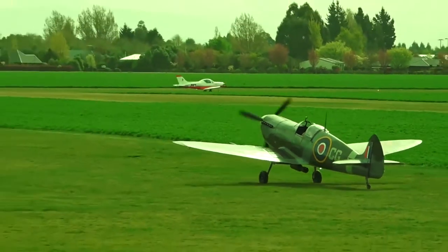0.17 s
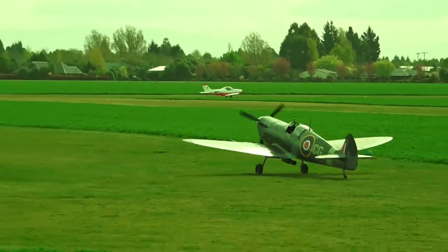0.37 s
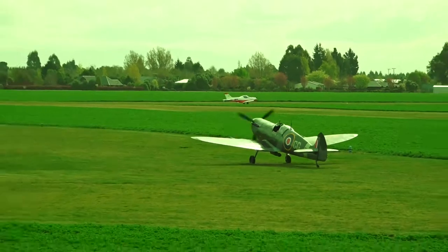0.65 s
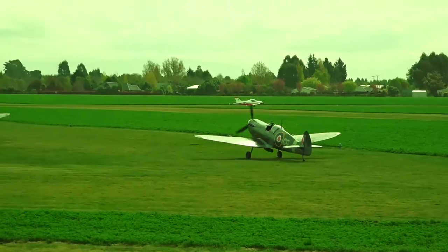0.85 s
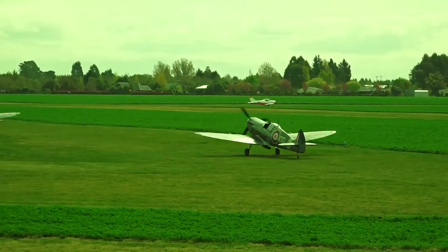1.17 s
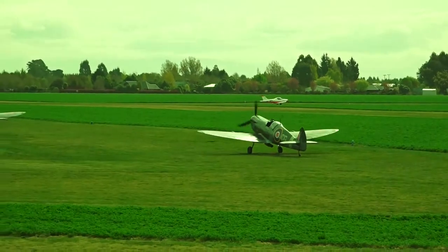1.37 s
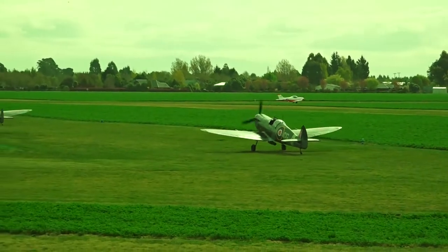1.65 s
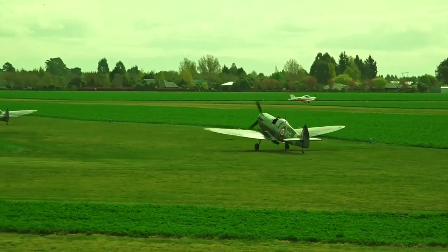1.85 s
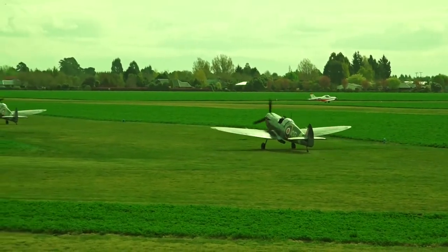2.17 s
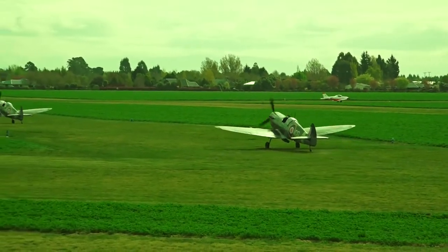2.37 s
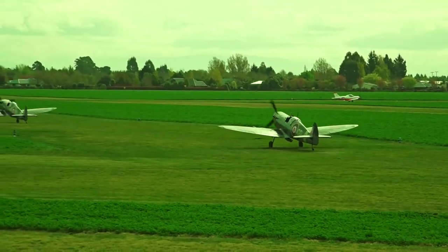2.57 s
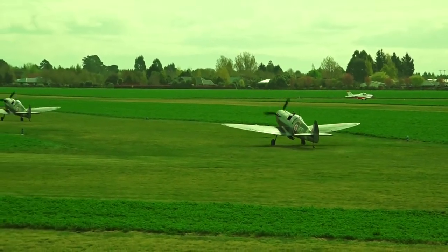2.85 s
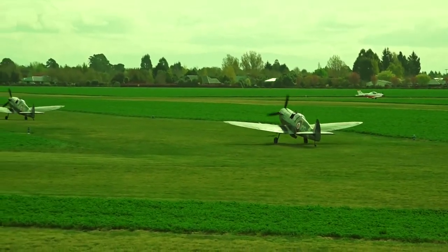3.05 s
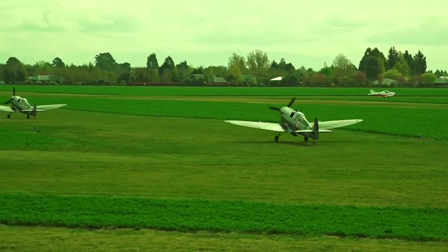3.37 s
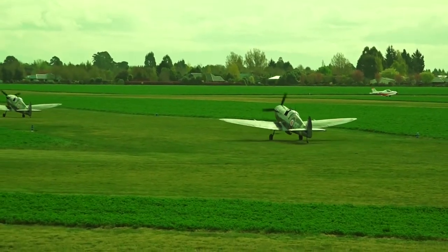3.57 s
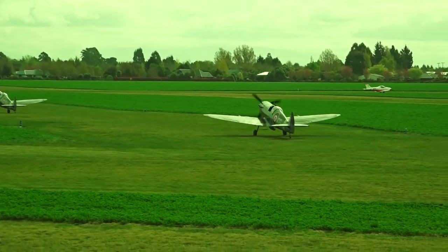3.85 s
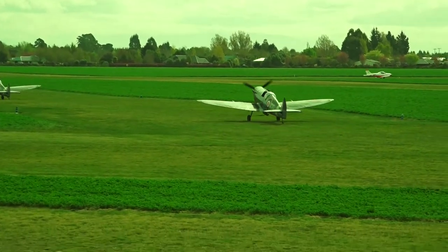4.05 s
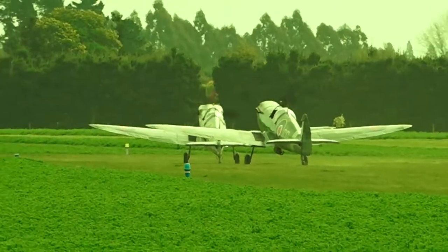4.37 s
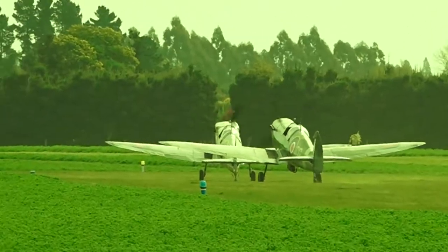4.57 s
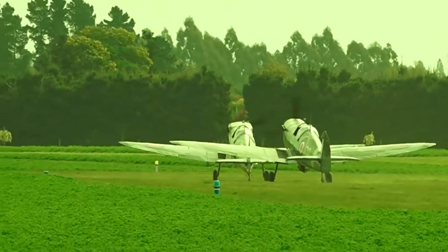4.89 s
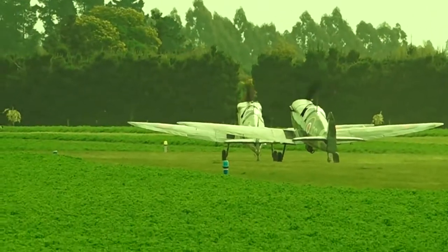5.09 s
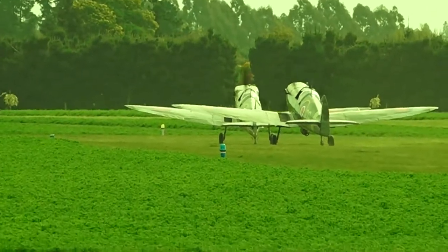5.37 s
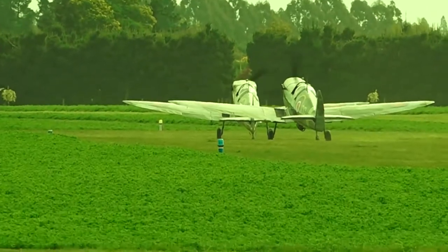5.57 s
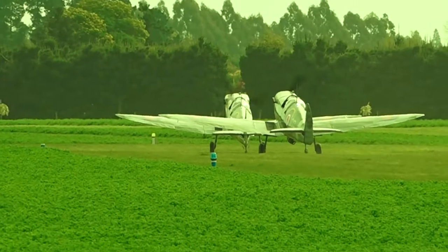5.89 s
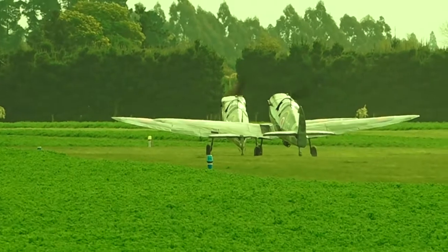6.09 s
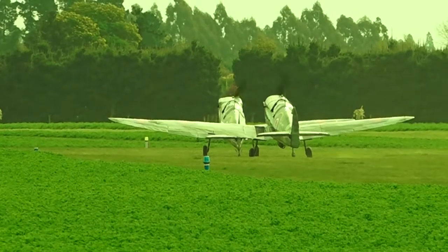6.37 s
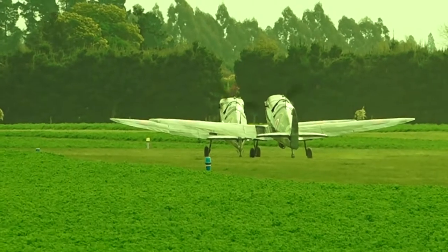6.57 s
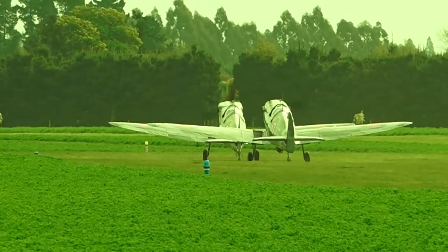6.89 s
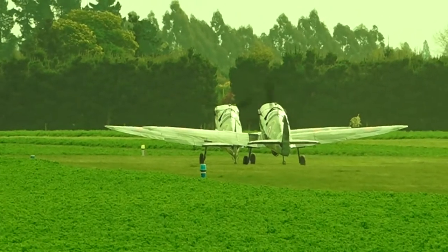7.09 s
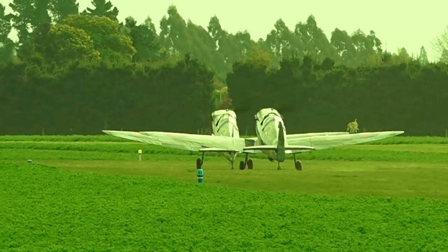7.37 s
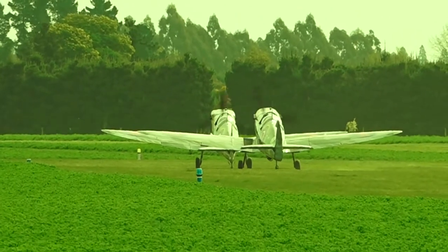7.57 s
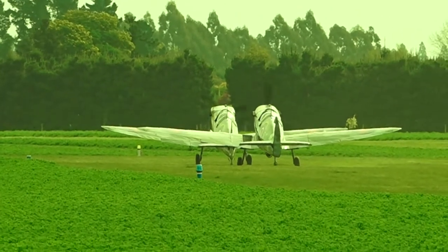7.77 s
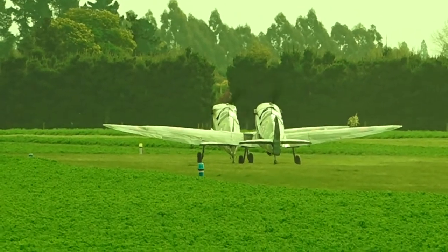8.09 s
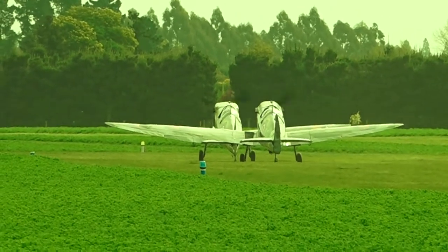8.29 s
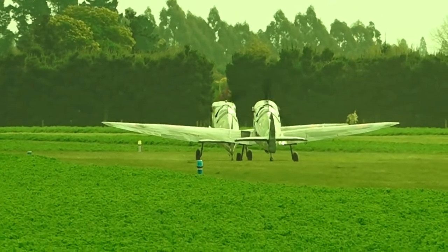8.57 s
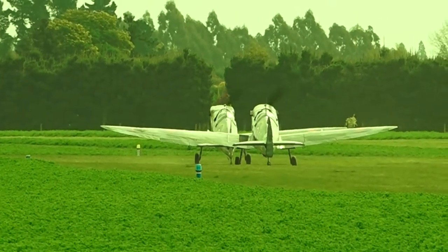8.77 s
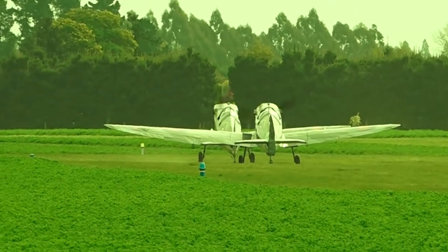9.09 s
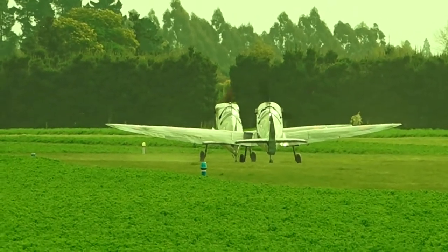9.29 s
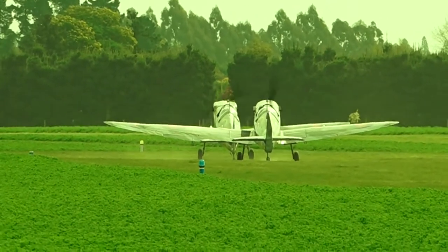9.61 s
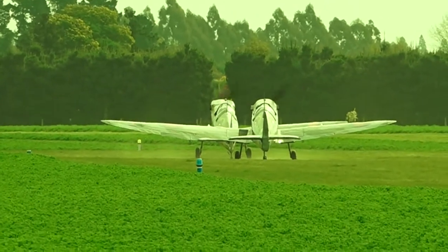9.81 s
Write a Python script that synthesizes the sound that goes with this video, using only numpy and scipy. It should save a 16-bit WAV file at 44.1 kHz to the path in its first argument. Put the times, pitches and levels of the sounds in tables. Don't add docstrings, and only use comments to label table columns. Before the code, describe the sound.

Close propeller plane growls louder for four seconds, then the scene snaps to low gusty wind thumps, faint lark song and far-off engines.

```python
import sys
import numpy as np
from scipy import signal
from scipy.fft import rfft, irfft, next_fast_len
from scipy.io import wavfile
from scipy.ndimage import uniform_filter1d, map_coordinates

SR = 44100
rng = np.random.default_rng(int(sys.argv[2]) if len(sys.argv) > 2 else 0)


def file_out(sig):
    cols = np.atleast_2d(sig).T
    lim = np.clip(cols, -1, 1)
    pcm = np.round(lim * 32767).astype(np.int16)
    wavfile.write(sys.argv[1], SR, pcm)


def voltage_ratio(decibels):
    exponent = np.asarray(decibels, float) / 20
    return 10 ** exponent


N = 438345
TIME = np.arange(N) / SR
CUT_S, FADE_S = 4.1355, 0.019
TURN_S = 2.33


def unit(x):
    return x / np.sqrt(np.mean(x ** 2) + 1e-20)


def curves(rows):
    t_s, *cols = np.transpose(rows)
    return [np.interp(TIME, t_s, c) for c in cols]


def wobble(rate_hz):
    coarse = TIME[::64]
    knots = rng.standard_normal(int(N * rate_hz / SR) + 4)
    return np.interp(TIME, coarse, map_coordinates(knots, [coarse * rate_hz]))


def colour(points, hz):
    f_hz, db = np.transpose(points)
    gain = voltage_ratio(np.interp(np.log(hz + 1e-3), np.log(f_hz), db))
    return gain * (hz >= f_hz[0]) * (hz <= f_hz[-1])


def shaped(x, points):
    m = next_fast_len(N + 8192)
    gain = colour(points, np.fft.rfftfreq(m, 1 / SR))
    return unit(irfft(rfft(x, m) * gain, m)[:N])


def noise(points):
    return shaped(rng.standard_normal(N), points)


def level(x, seconds):
    size = round(seconds * SR / 2)
    power = uniform_filter1d(uniform_filter1d(x ** 2, size), size)
    return x / np.sqrt(np.abs(power) + .05)


def add(track, t_s, sound):
    part = track[round(t_s * SR):][:len(sound)]
    part += sound[:len(part)]


# t/s, engine cycles/Hz
ENGINE_SPEED = [(0.0, 10.573), (0.4, 10.21), (0.7, 10.12), (1.0, 10.46), (1.4, 11.51), (1.8, 12.36),
                (2.2, 12.76), (2.6, 12.81), (4.1, 12.79)]


def aircraft():
    cycle_hz = uniform_filter1d(curves(ENGINE_SPEED)[0], size=SR // 5, mode="nearest")
    turns = np.cumsum(cycle_hz) / SR
    return exhaust(turns, cycle_hz) + propeller(turns, cycle_hz)


# multiple of the cycle, full-speed level/dB, gain per Hz of lower speed/dB
FIRING_ORDERS = [(8, 16, -1.5), (10, -13, -2), (11, 13, -2.5), (12, 4, -5), (13.04, 13.5, -0.74),
                 (14.02, 3, 0), (14.97, 3.5, 1.5), (15.94, 13.5, -3), (17.01, 2.5, 0.3), (18, -2, -2.1),
                 (18.94, 5, 0.2), (21, 13.5, -2.5), (22.04, 4.5, -1.5), (23.12, -1, -1.5), (23.94, 6.5, -2),
                 (25, -5.5, 0.2), (25.98, 2, -4), (26.97, 3, -0.5), (27.97, -3.5, 0), (29.02, -0.5, -0.2),
                 (30.1, 1.5, -2.5), (31.02, 3.5, -3.5), (31.86, 1, 1.24), (32.85, -4.5, -3.5),
                 (33.75, -1.5, -3.5), (34.9, -7, 1.5), (36.1, -8, -2.5), (37.1, -9, -2), (37.95, 4, -5.5),
                 (40, -2, -0.5), (41.14, 1.5, -1), (41.9, -5.5, -1.5), (42.7, -4.5, -0.5), (44, 2.3, -2.5),
                 (44.7, -3, -1.6)]
# f/Hz, level/dB
PIPE_COLOUR = [(70.0, -21.5), (110.0, -18), (150.0, -8.5), (190.0, -4), (230.0, -10), (270.0, -2),
               (310.0, 1), (350.0, -0.5), (400.0, -8.5), (460.0, -6.5), (600.0, -26.5)]
# f/Hz, level/dB per Hz
BREATH_COLOUR = [(60, 1), (110, 9), (200, 13.5), (320, 1), (450, -13), (600, -45.5)]


def exhaust(turns, cycle_hz):
    idle_hz, idle_db, rev_db_per_hz = 10.04, -24, 1.5
    turn_db_per_s, beat_db_per_s = 2, 5
    even_share, even_s = .45, .03
    firing, near = np.zeros(N), TIME < CUT_S + FADE_S
    slack_hz = cycle_hz.max() - cycle_hz
    beat_db = beat_db_per_s * np.clip(TIME[near] - 2.6, 0, 1)
    for k, full_db, slow_db in FIRING_ORDERS:
        wander = (0.23 + 0.18 * slack_hz) * wobble(6.06)
        phase = 2 * np.pi * k * turns[near] + rng.uniform(0, 2 * np.pi) + wander[near]
        order_db = full_db + slow_db * slack_hz[near] + (k < 9) * beat_db + 1.37 * wobble(4.996)[near]
        firing[near] += voltage_ratio(order_db) * colour(PIPE_COLOUR, k * cycle_hz[near]) * np.sin(phase)
    firing[~near] = firing[near].std()
    steady = level(unit(firing), 0.9)
    tone = (1 - even_share) * steady + even_share * level(steady, even_s)
    puffs = 1 + .5 * np.cos(2 * np.pi * 8 * turns)
    loud_db = idle_db + rev_db_per_hz * (cycle_hz - idle_hz)
    loud_db = loud_db - turn_db_per_s * np.maximum(TIME - TURN_S, 0)
    return voltage_ratio(loud_db) * (tone + voltage_ratio(-11) * puffs * noise(BREATH_COLOUR))


# t/s, level/dB
BLADE_LOAD = [(0, -1), (0.94, -5.5), (1.9, 1), (2.6, 2.5), (2.9, 1.5), (3.3, 2.5), (3.55, 1), (3.8, 1.5),
              (4.1, 2)]
# t/s, share 0-1
SLAP_DEPTH = [(0, 0), (1, 0.07), (1.6, 0.16), (2, 0.3), (2.6, .38), (3.3, 0.45), (3.7, 0.16), (4.1, 0.07)]
# t/s, peak level/dB
HARD_SLAPS = [(1.858, -21), (1.879, -22), (1.925, -21), (1.951, -21), (1.975, -20), (2.045, -17.5),
              (2.067, -22), (2.16, -22), (2.206, -23), (2.251, -23), (2.299, -24), (2.317, -23),
              (2.455, -21), (2.523, -20), (2.545, -19), (2.568, -21), (2.591, -18), (2.636, -17),
              (2.659, -18), (2.681, -22), (2.704, -19), (2.749, -18), (2.772, -22), (2.819, -24),
              (2.842, -25), (2.955, -22), (2.977, -22), (3.134, -20.5), (3.179, -22), (3.202, -19),
              (3.225, -18), (3.248, -17), (3.267, -19), (3.295, -17.5), (3.381, -20), (3.5, -21)]
# f/Hz, level/dB per Hz
WASH_COLOUR = [(220, -3), (380, -7), (456, -10), (480, -5.5), (879, -8), (1450, -11), (1800, -19),
               (2100, -18), (3000, -36), (3900, -65), (6600, -120)]
# f/Hz, level/dB per Hz
TIP_COLOUR = [(1500, -62), (2200, 7), (3000, 2.5), (4500, -6), (6500, -17), (9000, -23.5), (12000, -60)]
# f/Hz, level/dB per Hz
THUD_COLOUR = [(300, -30), (430, -4), (500, 0.5), (680, 0), (950, -3.5), (1300, -8.5), (1800, -13.5),
               (2600, -21), (4000, -45)]


def propeller(turns, cycle_hz):
    passes_per_cycle, known_pass_s = 3.451, 2.592
    load_db, = curves(BLADE_LOAD)
    wash_db, tip_db = -33.5 + 0.51 * load_db, -48.5 + load_db
    depth = np.clip(curves(SLAP_DEPTH)[0], 0, 1)
    swung_s = np.clip(TIME - TURN_S, 0, None)
    behind = np.clip(2.7 * (TIME - 3.56), 0, 1)

    blades = passes_per_cycle * (turns - turns[round(known_pass_s * SR)]) + 100 + .003 * wobble(25)
    count = np.maximum.accumulate(blades).astype(int)
    size_db = 1.2 * rng.standard_normal(424) - 1.5
    slap_s, slap_db = np.transpose(HARD_SLAPS)
    hard = np.round(np.interp(slap_s, TIME, blades)).astype(int)
    size_db[hard] = 0.4 * (slap_db + 23)
    size = voltage_ratio(size_db).take(count, mode="wrap")

    cycle_part = blades % 1
    since_s = (cycle_part - .08 - (cycle_part > .6)) / (passes_per_cycle * cycle_hz)
    rise_s, fall_s = 0.0013 + 0.0019 * np.minimum(swung_s, 1), .003
    puff = size * np.exp(-np.abs(since_s) / np.where(since_s < 0, rise_s, fall_s))
    gate = np.sqrt(1 - depth) + (1 - 0.23 * behind) * np.sqrt(depth) * unit(puff)
    gate = gate / np.sqrt(uniform_filter1d(gate ** 2, SR // 4))

    passes = size * np.diff(count, prepend=count[0])
    ahead = np.clip(0.67 * swung_s, 0, 1) * voltage_ratio(1.8 * wobble(40))
    split = passes + ahead * np.roll(passes, -round(.004 * SR))
    facets = rng.standard_normal(440)
    airframe = facets * voltage_ratio(-60 * TIME[:440] / .013)
    airframe[0] = 7
    late_samples = (np.abs(facets[-9:]) * 3000 % 1000).astype(int)
    fuselage = np.bincount(late_samples, 7 * np.sign(facets[:9]))
    side_on = signal.fftconvolve(split, airframe)[:N]
    tail_on = signal.fftconvolve(passes, fuselage)[:N]
    slaps = (1 - behind) * side_on + voltage_ratio(-4) * behind * tail_on

    thuds, cracks = shaped(slaps, THUD_COLOUR), shaped(slaps, TIP_COLOUR)
    wash = gate ** 0.62 * noise(WASH_COLOUR) + voltage_ratio(1.0) * np.sqrt(depth + .05 * behind) * thuds
    tips = gate ** 0.71 * noise(TIP_COLOUR) + 0.5 * np.sqrt(depth) * cracks
    return voltage_ratio(wash_db + wobble(7.82)) * wash + voltage_ratio(tip_db + wobble(8.1)) * tips


# t/s, length/s, heave level/dB, buffet over heave/dB
GUST_EVENTS = [(0, 0.041, -15, -0.5), (0.365, 0.33, -19.5, -11), (.6, 0.21, -21.5, -2),
               (1.01, 0.3, -20.5, -13), (1.83, .4, -28, -5), (2.2, .2, -20, -8), (2.898, 0.28, -24, -4),
               (3.163, 0.36, -24, -1), (3.61, 0.13, -18, -4.5), (3.863, 0.22, -22, 3.5),
               (4.368, 0.19, -5.5, -16.5), (4.596, 0.25, -8.5, -25), (4.8, 0.16, -9, -10),
               (5.03, 0.23, -24.5, -3), (5.199, 0.11, -13.5, -11), (5.27, 0.1, -3, -14),
               (5.45, .12, -20.5, 0), (5.59, 0.14, -4.5, -16), (5.8, 0.33, -16, -3.5),
               (6.046, 0.17, -5.5, -13), (6.314, 0.15, -16, -4.5), (6.654, 0.31, -8, -19.5),
               (7.02, 0.26, -9, -9), (7.313, 0.17, -10, -11), (7.538, 0.21, -8.5, -23),
               (7.799, 0.12, -8.5, -25), (8.2, 0.35, -15, -9), (8.426, 0.13, -12, -14),
               (8.614, 0.1, -12.5, -8.5), (8.9, 0.33, -14, -7), (9.087, 0.18, -14, -13),
               (9.402, 0.18, -13.5, -32), (9.565, 0.1, -3.5, -15.5), (9.73, 0.073, -12, 3),
               (9.84, 0.18, -11, 6)]
# f/Hz, level/dB per Hz
HEAVE_COLOUR = [(1.3, -26), (2.7, -11.5), (5.4, 7), (10, 8), (16, -8.5), (22, -25), (30, -36)]
# f/Hz, level/dB
HEAVE_LIMIT = [(.5, 0), (17, 0), (24, -8), (34, -30), (60, -70)]
# f/Hz, level/dB per Hz
BUFFET_COLOUR = [(13, -18), (20, 0), (31, -6), (40, -13), (50, -21), (65, -28), (100, -34), (200, -48),
                 (400, -60), (1000, -90)]


def wind():
    calm_heave_db, calm_buffet_db = -31, -33.5
    bells = np.array([np.exp(-(2 * (TIME - t_s) / length_s) ** 2) for t_s, length_s, _, _ in GUST_EVENTS])
    heave_db, over_db = np.transpose(GUST_EVENTS)[2:]
    heave = np.sqrt(voltage_ratio(2 * calm_heave_db) + voltage_ratio(2 * heave_db) @ bells)
    buffet = np.sqrt(voltage_ratio(2 * calm_buffet_db) + voltage_ratio(2 * (heave_db + over_db)) @ bells)
    slow = shaped(level(noise(HEAVE_COLOUR), 0.079), HEAVE_LIMIT)
    quick = voltage_ratio(1.3 * wobble(18)) * level(noise(BUFFET_COLOUR), 0.072)
    return heave * slow + buffet * quick


def larks():
    song = np.zeros(N)
    sing_whistles(song)
    sing_arches(song)
    sing_trills(song)
    t = TIME[:SR // 5]
    scatter = unit(rng.standard_normal(len(t)) * voltage_ratio(-60 * t / 0.21)) / np.sqrt(len(t))
    echo = signal.fftconvolve(song, scatter)[:N]
    return song * voltage_ratio(1.9 * wobble(70)) + voltage_ratio(-7) * echo


def whistle(length_s, glide, db):
    u = np.linspace(0, 1, round(length_s * SR))
    shape = np.minimum(1, np.sin(np.pi * u) * (1 + length_s / 0.021))
    return voltage_ratio(db + 5.5) * shape * np.sin(2 * np.pi * np.cumsum(glide(u)) / SR)


# t/s, length/s, start f/Hz, end f/Hz, level/dB
WHISTLES = [(0.3, 0.16, 3880, 4100, -63), (1.01, 0.15, 4730, 4480, -69), (1.085, 0.1, 5400, 5240, -67),
            (2.487, 0.093, 5140, 4650, -65.5), (7.738, .032, 6500, 5100, -69),
            (7.502, .045, 5950, 5150, -69), (2.888, 0.1, 4150, 4420, -60),
            (3.01, .075, 4560, 4480, -62), (.455, .04, 4800, 4750, -68), (.925, .065, 3900, 3950, -67),
            (5.965, .12, 4150, 3980, -73), (4.38, .06, 4420, 4600, -68), (.24, .085, 2900, 2620, -57),
            (4.52, .057, 4300, 3850, -61), (4.57, 0.15, 4350, 3710, -64.5),
            (4.69, 0.23, 3700, 3460, -62), (6.064, .087, 4500, 3900, -70),
            (6.195, 0.028, 4700, 4500, -64), (6.32, .04, 5350, 4750, -66),
            (6.363, 0.055, 4200, 3400, -70), (6.625, 0.217, 4640, 4550, -64),
            (6.76, 0.086, 3450, 3040, -67), (6.934, 0.045, 4250, 4150, -69),
            (8.058, .085, 3540, 3320, -67), (7.42, .1, 4400, 4000, -65), (7.512, .27, 3900, 3470, -69),
            (7.815, .03, 3480, 3400, -68), (.65, .07, 4750, 2700, -61), (8.39, 0.035, 5400, 4630, -64),
            (8.417, .12, 4700, 3900, -59), (9.723, .15, 5040, 3900, -68),
            (.82, 0.042, 3650, 3330, -60)]
# t/s, start f/Hz, end f/Hz, level/dB
LARK_FLICKS = [(4.153, 4420, 4490, -67), (.435, 4850, 5100, -64), (4.52, 3780, 3290, -63),
               (4.57, 5750, 5900, -68), (4.861, 5680, 5870, -67), (5.096, 6470, 6230, -69),
               (5.215, 2550, 2500, -65), (5.22, 3800, 4000, -61), (5.525, 3800, 3900, -65),
               (5.612, 2250, 2640, -65), (6.07, 3750, 3650, -66), (7.28, 4300, 3500, -68),
               (4.345, 5000, 4350, -69), (5.765, 4000, 3500, -68), (7.391, 4220, 3800, -64),
               (7.778, 4700, 2500, -65), (8.556, 4250, 3550, -63), (3.075, 4250, 3900, -62),
               (2.86, 5050, 5300, -66), (4.42, 4900, 4700, -66), (.28, 3650, 3850, -62),
               (8.481, 3290, 3320, -63), (8.572, 3300, 3750, -66), (8.595, 3980, 3660, -62),
               (8.757, 3940, 2900, -61), (8.795, 3750, 2950, -64), (8.935, 4800, 4350, -64),
               (9.005, 4700, 4650, -64), (9.088, 3800, 3100, -68), (9.125, 4800, 3800, -66),
               (2.705, 4500, 4200, -59), (2.73, 3900, 3500, -60), (2.56, 4500, 4300, -61),
               (9.406, 3540, 3400, -62), (7.645, 5150, 5250, -68), (9.89, 3640, 3550, -67)]
# t/s, start f/Hz, end f/Hz, level/dB
LARK_PIPS = [(4.788, 4400, 4700, -59), (4.81, 3500, 2900, -61), (5.08, 4600, 4800, -64),
             (5.099, 5200, 4700, -63), (5.121, 5200, 4900, -61), (5.438, 3700, 3650, -65),
             (5.456, 3700, 3500, -65), (5.664, 3950, 3800, -65), (5.714, 3500, 3300, -65),
             (5.804, 2400, 2600, -61), (6.123, 3900, 3400, -62), (6.216, 4000, 3500, -64),
             (6.275, 3700, 4100, -65), (6.313, 4750, 4400, -61), (6.405, 3400, 2900, -59),
             (6.43, 2700, 3000, -64), (6.486, 2800, 2650, -64), (6.588, 5000, 4500, -65),
             (6.676, 5000, 4250, -62), (6.72, 4500, 4200, -62), (6.808, 4600, 3400, -66),
             (6.836, 3000, 3900, -63), (6.867, 2800, 3600, -59), (6.884, 2700, 2400, -63),
             (6.9, 2900, 3400, -65), (6.945, 3800, 3400, -65), (6.968, 4500, 4050, -63),
             (6.988, 4500, 4050, -63), (7.016, 2900, 3600, -66), (7.135, 4600, 4200, -66),
             (7.436, 5750, 5550, -65), (7.048, 2900, 3500, -61), (7.078, 3600, 4100, -63),
             (7.153, 4000, 2700, -58), (7.166, 3400, 2400, -64), (7.221, 3900, 4050, -64),
             (7.268, 4200, 2600, -62), (7.452, 4100, 2900, -62), (7.628, 2900, 2500, -69),
             (7.668, 3300, 2300, -65), (7.802, 4000, 3100, -65), (7.872, 3200, 2700, -66),
             (8.055, 3100, 3500, -56), (8.293, 3300, 2800, -64), (8.363, 6150, 6000, -65),
             (8.415, 3600, 3550, -61), (8.755, 4200, 3700, -62), (8.87, 4100, 3900, -62),
             (8.745, 4300, 3600, -64), (8.815, 4100, 3400, -66), (9.045, 3200, 2800, -66),
             (8.378, 5800, 5600, -62), (8.396, 5250, 5100, -59)]


def sing_whistles(song):
    flicks = [(t_s, .03, *rest) for t_s, *rest in LARK_FLICKS]
    pips = [(t_s, .012, *rest) for t_s, *rest in LARK_PIPS]
    for t_s, length_s, start_hz, end_hz, db in list(WHISTLES) + flicks + pips:
        add(song, t_s, whistle(length_s, lambda u: end_hz + (start_hz - end_hz) * (1 - u) ** 1.4, db))


# t/s, length/s, top f/Hz, level/dB
ARCHED_CALLS = [(4.742, 0.06, 4050, -64), (5.04, .06, 4480, -64), (7.028, .034, 2800, -65),
                (7.066, .034, 2650, -64), (7.103, .032, 2620, -63), (7.236, 0.042, 4430, -61),
                (7.29, .032, 2750, -65), (7.325, .032, 2750, -65), (7.37, .014, 2550, -65),
                (7.606, 0.022, 3070, -62), (7.636, 0.041, 3620, -57), (7.703, 0.037, 3900, -60),
                (7.816, .02, 3020, -65), (7.844, 0.032, 3480, -57), (8.238, .026, 2950, -66),
                (8.264, .036, 3480, -64), (8.701, 0.062, 4040, -62)]


def sing_arches(song):
    drop, flatness = 0.144, 2.96
    for t_s, length_s, top_hz, db in ARCHED_CALLS:
        add(song, t_s, whistle(length_s, lambda u: top_hz * (1 - drop * np.abs(2 * u - .9) ** flatness), db))


def trill(length_s, hz, sweep_hz, rate_hz, db):
    t = np.arange(round(length_s * SR)) / SR
    drift = np.cumsum(rng.standard_normal(len(t))) * np.sqrt(rate_hz / SR)
    beat = (t * rate_hz + (rate_hz / 2500) * drift) % 1
    shape = np.sin(np.pi * np.minimum(beat / 0.65, 1)) * np.sin(np.pi * t / length_s) ** 0.16
    pitch_hz = hz + sweep_hz * (beat - .35) / .5
    return voltage_ratio(db + 11.5) * shape * np.sin(2 * np.pi * np.cumsum(pitch_hz) / SR)


# t/s, length/s, f/Hz, beat rate/Hz, level/dB
SLOW_TRILLS = [(4.19, .06, 2900, 70, -66), (4.634, 0.1, 3000, 55, -66), (4.921, 0.1, 3200, 70, -67),
               (5.45, .15, 4000, 70, -74), (6.23, 0.14, 3100, 74, -70), (6.529, 0.22, 3400, 82, -61.5),
               (8.04, 0.39, 3800, 58, -73), (8.615, .06, 3100, 79, -64), (8.661, .06, 3750, 80, -63),
               (9.19, .05, 3800, 70, -69), (8.87, .11, 3500, 60, -69), (9.547, .16, 3200, 70, -70)]
# t/s, length/s, f/Hz, beat rate/Hz, level/dB
FAST_PURRS = [
    (5.33, .062, 3050, 200, -64),
    (6.056, .046, 4880, 75, -66),
    (7.163, 0.026, 3280, 117, -60),
    (7.468, 0.097, 3170, 190, -58),
]


def sing_trills(song):
    for calls, sweep_hz in ((SLOW_TRILLS, 448), (FAST_PURRS, 150)):
        for t_s, length_s, hz, rate_hz, db in calls:
            add(song, t_s, trill(length_s, hz, sweep_hz, rate_hz, db))


def chatter():
    song, u = np.zeros(N), np.linspace(0, 1, 600)
    for when, pitch, bend, size in rng.uniform(0, 1, (1300, 4)):
        hz = (2700 + 2200 * pitch ** 1.3) * (1 + .5 * (bend - .8) * u)
        chirp = np.sin(np.pi * u) * np.sin(2 * np.pi * np.cumsum(hz) / SR)
        add(song, when * N / SR, voltage_ratio(-66 + 7 * size) * chirp)
    return song * voltage_ratio(1.5 * wobble(5))


# t/s, level/dB, low f/Hz, high f/Hz, t60/s
BODY_TICKS = [
    (3.591, -18.5, 2800, 5570, 0.0068),
    (3.853, -15, 4180, 6660, 0.0071),
]
# t/s, level/dB
MEMBRANE_SLIPS = [
    (4.3016, -20.5),
    (4.3045, -19),
    (5.253, -24),
    (5.256, -18),
    (9.497, -20),
]
# t/s, length/s, level/dB
SLEEVE_BRUSH = (6.29, .26, -57)
# f/Hz, level/dB
CLOTH_COLOUR = [(500, -30), (900, -3), (2000, 1), (2500, -10), (5000, -20), (5700, -6), (6100, -16),
                (6600, -5), (7200, -40)]


def handling():
    out, t = np.zeros(N), TIME[:SR // 20]
    for t_s, db, low_hz, high_hz, t60_s in BODY_TICKS:
        ring = np.sin(2 * np.pi * low_hz * t) + .3 * np.sin(2 * np.pi * high_hz * t)
        ring = ring + .7 * uniform_filter1d(rng.standard_normal(len(t)), size=4)
        add(out, t_s, voltage_ratio(db - 60 * t / t60_s) * ring * (1 - np.exp(-t / 0.00057)))
    for t_s, db in MEMBRANE_SLIPS:
        add(out, t_s, -voltage_ratio(db) * (1 - np.exp(-t / 0.00032)) * np.exp(-t / 0.016))
    t_s, length_s, db = SLEEVE_BRUSH
    brush = np.sin(np.pi * np.clip((TIME - t_s) / length_s, 0, 1))
    return out + voltage_ratio(db + 2.1 * wobble(59)) * brush * noise(CLOTH_COLOUR)


# t/s, engine level/dB, roar level/dB
FAR_LEVELS = [
    (4.13, -37.5, -54),
    (4.75, -43.5, -54),
    (9.31, -41.5, -55),
    (9.94, -35, -51.5),
]
# f/Hz, level/dB per Hz
DRONE_COLOUR = [(41, -40), (70, 6.5), (81, -5), (124, -2), (146, -4), (199, -7.5), (216, -14.5),
                (247, -12.5), (450, -24.5), (580, -33.5), (990, -120)]
# f/Hz, level/dB per Hz
ROAR_COLOUR = [(240, -9.5), (400, -3), (588, -5.5), (651, -4), (1340, -10), (1760, -14.5), (3810, -20),
               (6000, -63), (7800, -53), (13200, -120)]
# f/Hz, level/dB
FAR_TONES = [(194.6, -51.5), (123.3, -52), (93.5, -50), (260, -67.5)]


def field():
    drone_db, roar_db = curves(FAR_LEVELS)
    out = np.zeros(N)
    for hz, db in FAR_TONES:
        out += voltage_ratio(db + 2.5 + 1.97 * wobble(4)) * np.sin(2 * np.pi * hz * TIME + 0.81 * wobble(5))
    out += voltage_ratio(drone_db + 1.3 * wobble(7.8)) * noise(DRONE_COLOUR)
    return out + voltage_ratio(roar_db + 1.07 * wobble(7.0)) * noise(ROAR_COLOUR)


# f/Hz, level/dB per Hz
HISS_COLOUR = [(2000, -22), (4000, 4.5), (6000, 1.5), (11500, 1), (12500, 1.5), (16000, 1)]
# f/Hz, rms level/dB
WHINE_TONES = [(10200, -82), (12100, -88), (15100, -87), (15150, -87)]


def electronics():
    whine = sum(voltage_ratio(db) * np.sqrt(2) * np.sin(2 * np.pi * hz * TIME) for hz, db in WHINE_TONES)
    return voltage_ratio(-60.5) * noise(HISS_COLOUR) + whine


def scene():
    outdoors = np.where(TIME < CUT_S, aircraft(), field())
    return (outdoors + wind() + larks() + chatter() + handling())[None]


def roll_off(x):
    return signal.sosfilt(signal.butter(12, 16900, fs=SR, output="sos"), x)


def record(dry):
    top_hz = 15790
    x = np.clip(dry + electronics(), -1, 1)
    fade = np.clip(np.abs(TIME - CUT_S) / FADE_S, 0, 1) ** 1.9
    fade = fade * np.clip((TIME[-1] - TIME) / FADE_S, 0, 1)
    m = next_fast_len(N)
    x = irfft(rfft(x * fade, m) * (np.fft.rfftfreq(m, 1 / SR) < top_hz), m)[:, :N]
    return roll_off(x)


dry = scene()
out = record(dry)
file_out(out)
```